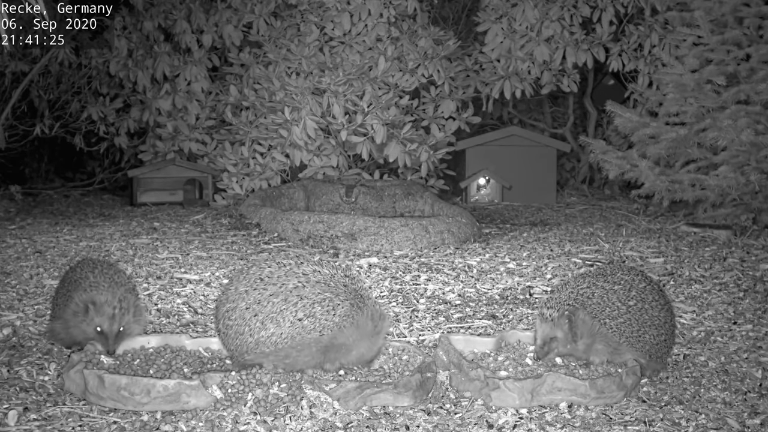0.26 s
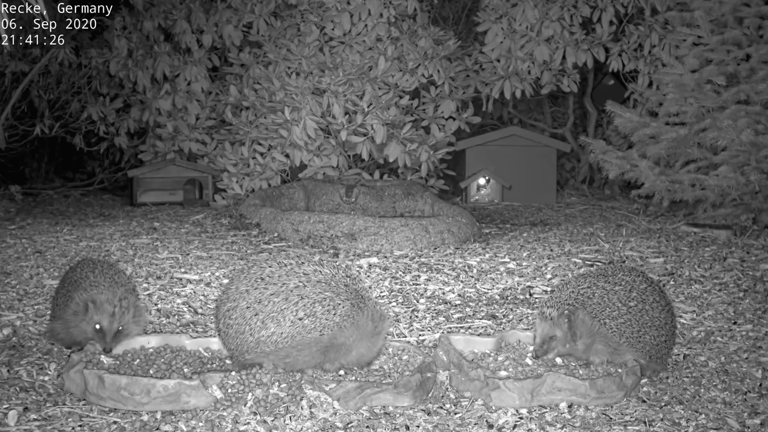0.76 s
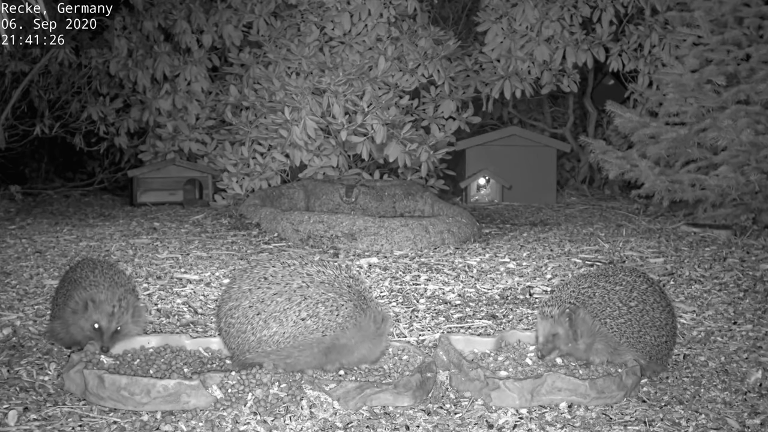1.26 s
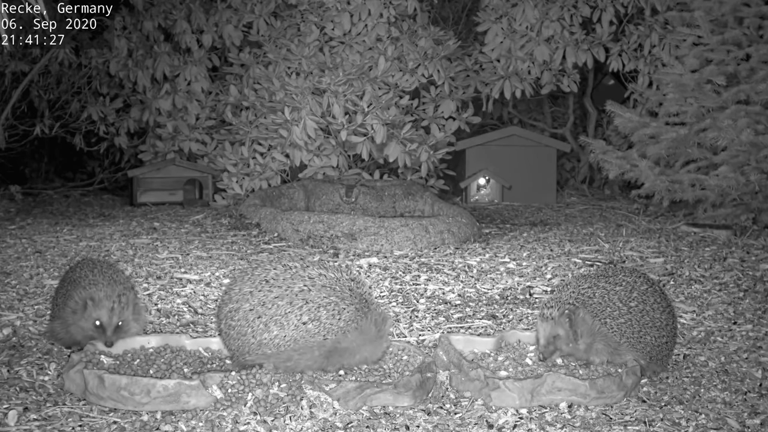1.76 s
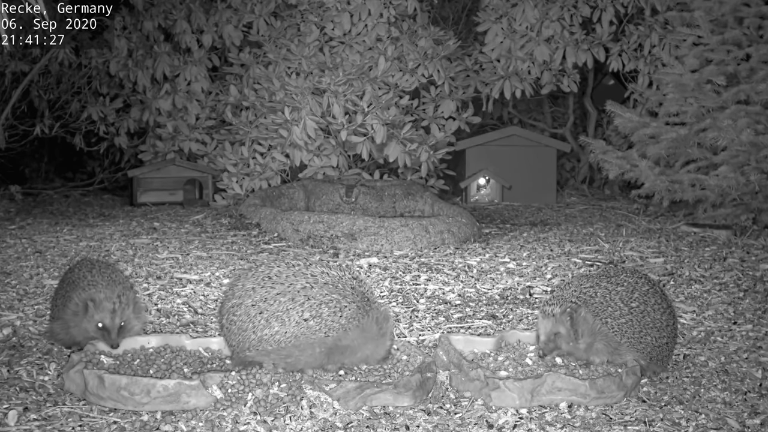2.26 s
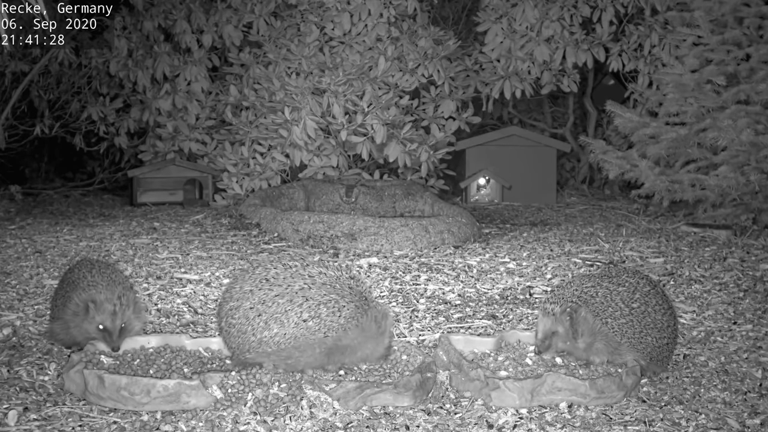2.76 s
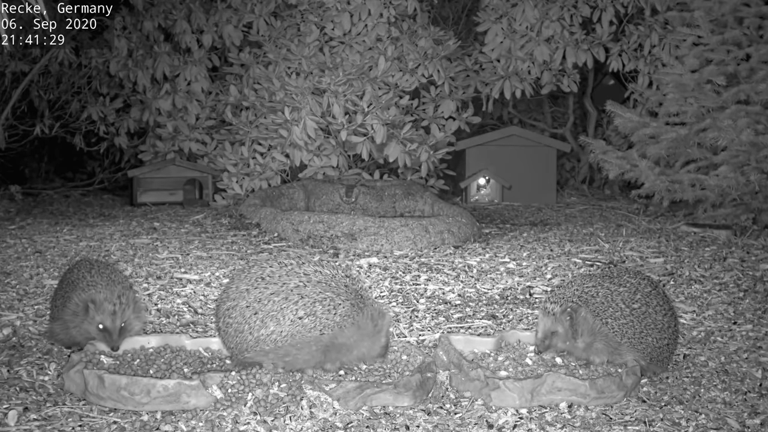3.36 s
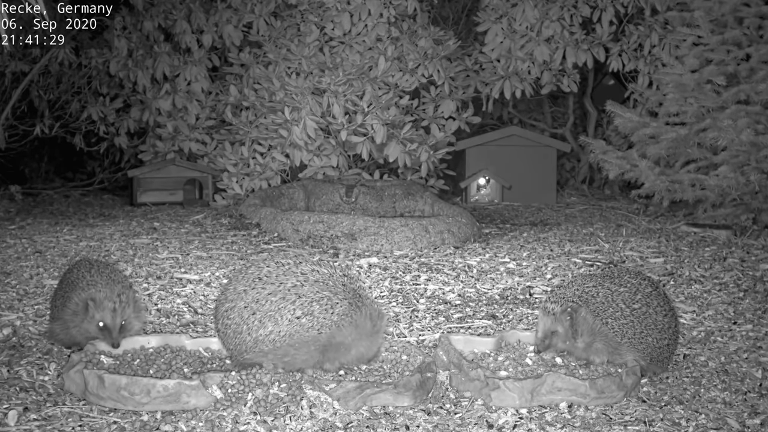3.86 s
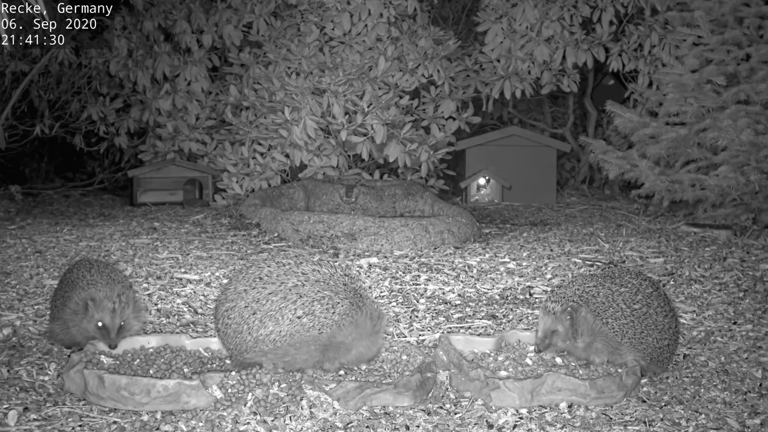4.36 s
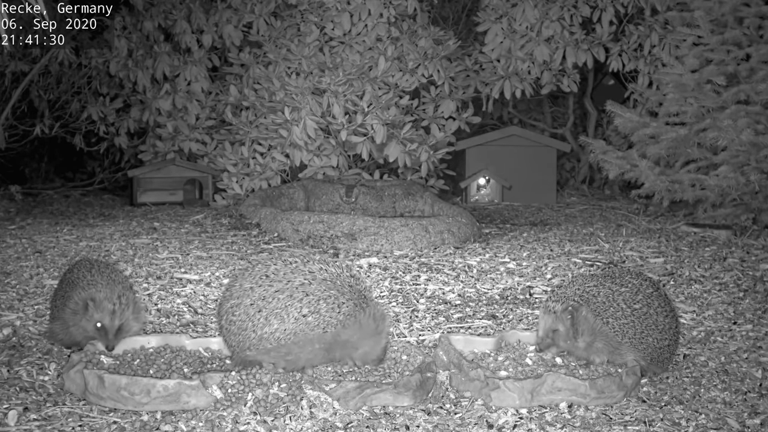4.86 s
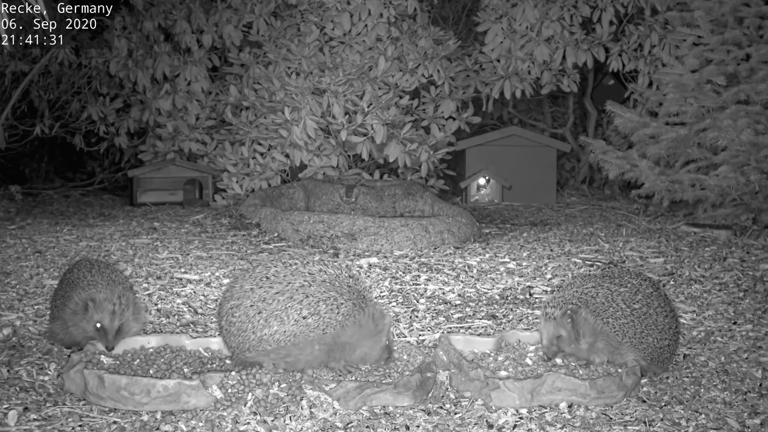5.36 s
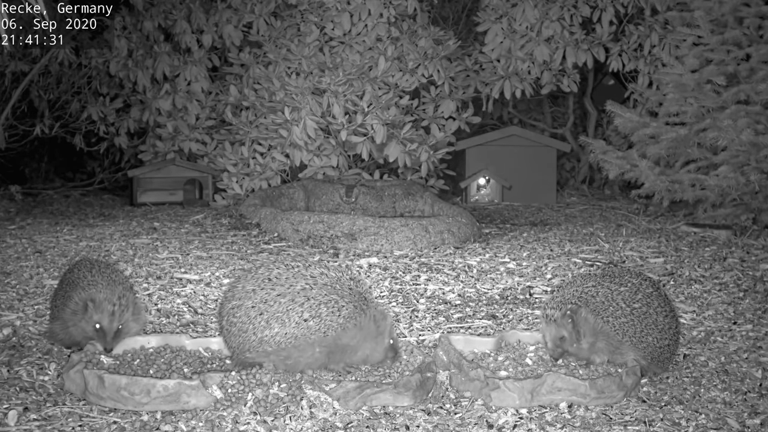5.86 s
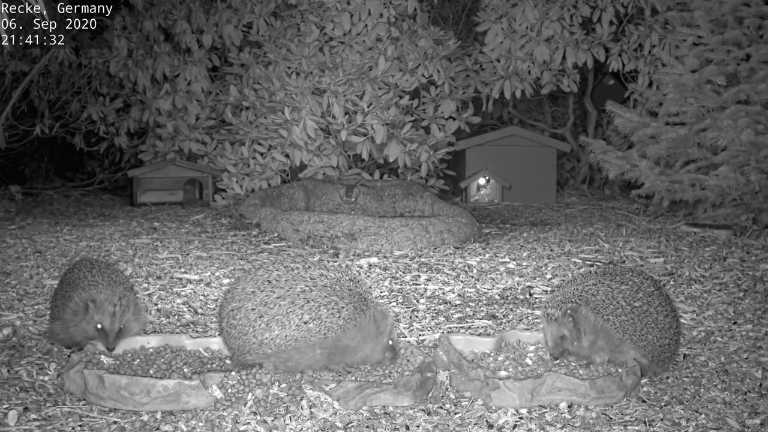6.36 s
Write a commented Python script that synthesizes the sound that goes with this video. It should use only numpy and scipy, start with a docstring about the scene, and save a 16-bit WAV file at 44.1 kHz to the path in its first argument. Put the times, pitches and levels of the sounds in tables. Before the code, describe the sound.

A quiet garden at night, with hedgehogs eating dry pellets close to a small housed microphone. Right at the start, two sharp, bright cracks almost together, then several lesser snaps until 0.4 seconds, with a soft puff near 0.3. From 0.5 to 1.1 only faint ticks. Between 1.2 and 2.1 the crunching is busiest: irregular brittle cracks, strongest around 1.35 and 1.55, with splinters and grit around each. A short grinding rush comes near 2.1, then brief fluttering sniffs at 2.2, 2.45 (the clearest) and 2.95. Duller moderate cracks fall around 2.7 and 3.0. From 3.3 to the end at about 6.6, chewing is sparse and weak, small clicks and crumbs, a duller knock near 5.2, faint sniffs near 5.1, 5.75 and 6.4, and a slightly firmer tick at 5.9. Steady low-weighted hiss continues throughout; the space is dry, with only tiny ground reflections.

```python
"""A garden at night: hedgehogs eat dry pellets close to a wildlife camera, under a steady low hiss.
Each pellet crack is an impulse with splinters, filtered by the ring of the pellet, a knock and a snap.
Smaller breaks follow as halves, grit and crumbs; short noise swells give sniffs and a rush of grinding.
Cracks and swells ring in the camera's housing and reflect in the garden; the hiss is shaped noise."""
import sys
import numpy as np
from scipy import signal
from scipy.fft import rfft, irfft
from scipy.io import wavfile
from scipy.ndimage import uniform_filter1d

SR = 44100
rng = np.random.default_rng(int(sys.argv[2]) if len(sys.argv) > 2 else 0)


def wrap_up_sound(samples):
    """Save the sound to the file named by the first command line argument, as 16-bit audio."""
    columns = np.atleast_2d(samples).T
    # keep every value between -1 and 1, then stretch to whole-number steps
    tamed = np.clip(columns, -1, 1)
    steps = np.round(tamed * 32767).astype(np.int16)
    wavfile.write(sys.argv[1], SR, steps)


N = 291045

# pellets cracking between the teeth: (time [s], ring frequency [Hz],
# ring level if its energy fell within 5 ms [dB], shatter: below 0 clean, above 0 rough [dB])
PELLET_BREAKS = [(0.0228, 5260, -24, -5.5), (0.03, 5470, -17.5, -4.5), (.175, 4440, -39.5, -10),
                 (0.2296, 4800, -41, 3), (0.2491, 5260, -25, -2), (.3108, 5400, -23.5, 6),
                 (.3684, 5000, -32.5, -10), (.542, 5070, -47.5, -4), (.84, 4440, -50.5, 4),
                 (.887, 4240, -38.5, 1), (.93, 6400, -47.5, 2), (1.106, 4500, -50.5, 6.5),
                 (1.166, 8100, -38, 1), (1.1786, 5460, -34, 3), (1.2083, 6540, -37.5, 2.5),
                 (1.29, 6540, -43, 1), (1.3423, 6500, -17, -8), (1.3769, 5970, -20.5, -0.5),
                 (1.455, 7300, -37, 1.5), (1.4816, 5600, -23, 2.5), (1.4915, 4140, -37, -7),
                 (1.542, 5180, -19.5, 1), (1.5515, 6400, -30, 3), (1.586, 5440, -27, 2),
                 (1.702, 5000, -36.5, 1), (1.822, 6200, -21.5, 0.5), (1.8384, 5000, -37.5, 5),
                 (2.002, 5030, -28.5, -2), (2.0225, 4900, -22, -0.5), (2.0432, 3730, -29, 2),
                 (2.08, 6300, -33.5, -1), (2.087, 4480, -35.5, 5.5), (2.1062, 6530, -32, 2.5),
                 (2.289, 4840, -38, 0.5), (2.319, 6300, -45, 2), (2.424, 4200, -33, 0.5),
                 (2.587, 4280, -41.5, 1.5), (2.6946, 4170, -29.5, -0.5), (2.7285, 2530, -29.5, 3.5),
                 (2.7955, 3750, -35, -5.5), (3.0356, 3900, -33.5, -4), (3.0396, 4220, -31.5, -2),
                 (3.304, 4270, -42.5, 2), (3.332, 4400, -40, 2.5), (3.3618, 5600, -44.5, 5),
                 (3.585, 3630, -47, 3), (3.6427, 4070, -37.5, 0.5), (3.6695, 4140, -39.5, -0.5),
                 (3.8426, 3960, -39.5, 2), (3.99, 3440, -46, -11), (4.384, 4120, -44.5, -2),
                 (4.514, 3520, -43.5, 2), (4.7998, 4270, -41, -3), (5.2317, 1080, -41.5, 1),
                 (5.355, 5600, -50, 8.5), (5.455, 3680, -54, -16), (5.645, 4730, -44, 3.5),
                 (5.828, 4170, -45, -4), (5.92, 4080, -36, -2), (6.153, 4420, -49, 4),
                 (6.1842, 3900, -44, 4), (6.4249, 5240, -39.5, 2)]

SIZE = 4096  # length of one impulse response [samples]
AGE = np.arange(SIZE) / SR  # time since the impulse [s]
BINS = np.fft.rfftfreq(SIZE, 1 / SR)  # [Hz]


def undb(db):
    """Level to amplitude: 20 dB is a factor of ten."""
    return 10 ** (np.asarray(db) / 20)


def unit(x):
    """Normalization to an rms value of 1."""
    return x / np.sqrt(np.mean(x ** 2))


def add(out, s, x):
    """Superposition: mix x into out from time s [s] on."""
    start = int(np.clip(s * SR, 0, N - 1))
    out[start:start + len(x)] += x[:N - start]


def resonance(f, hz, width):
    """Damped oscillator: complex response with gain 1 at its centre."""
    return 1j * f * width / (hz ** 2 - f ** 2 + 1j * f * width)


def band(hz, kind, order):
    """Butterworth filtering: complex response of a causal high- or band-pass."""
    b, a = signal.butter(order, hz, kind, fs=SR)
    return signal.freqz(b, a, BINS, fs=SR)[1]


def noise(points):
    """Spectral shaping: white noise coloured by (frequency [Hz], level [dB]) points, rms 1."""
    hz, db = np.transpose(points)
    f = np.maximum(np.fft.rfftfreq(N, 1 / SR), 1)
    colour = undb(np.interp(np.log(f), np.log(hz), db))
    return unit(irfft(rfft(rng.standard_normal(N)) * colour, N))


def prompt(gain):
    """Minimum phase: the causal response with this gain that gives out its energy earliest."""
    cepstrum = irfft(np.log(gain + 1e-3 * gain.max()))
    # fold the cepstrum onto positive times
    cepstrum[1:SIZE // 2] *= 2
    cepstrum[SIZE // 2 + 1:] = 0
    return np.exp(rfft(cepstrum))


def night(level_db=-40, waver_db=.3):
    """Stationary shaped noise: night air and microphone hiss, its level wavering very slightly."""
    # hiss spectrum: (frequency [Hz], relative density [dB per Hz])
    hiss_spectrum = [(11, -27), (18, 1.5), (43, 2), (74, -1.5), (212, -8.5), (290, -11.5), (385, -13.5),
                     (456, -17), (782, -19), (2300, -32.5), (3420, -33.5), (4170, -35.5), (7140, -37),
                     (15800, -39.5)]
    waver = np.interp(np.arange(N), np.linspace(0, N, 30), rng.standard_normal(30))
    return noise(hiss_spectrum) * undb(level_db + waver_db * waver)


def garden(x, bounce_s=.0025, bounce=0.19):
    """Reflection and scattering: a ground bounce, scatter from bowls and stones, a trace from shrubs."""
    scatter_db, scatter_t60_s = -16, .04
    shrubs_db, shrubs_t60_s = -30, .053
    echo = np.zeros(SIZE)
    for db, t60_s in (scatter_db, scatter_t60_s), (shrubs_db, shrubs_t60_s):
        decay = np.exp(-np.log(1000) * AGE / t60_s)
        tail = rng.standard_normal(SIZE) * decay * (AGE > bounce_s)
        echo += undb(db) * tail / np.linalg.norm(tail)
    echo[int(bounce_s * SR)] += bounce
    return x + signal.fftconvolve(x, echo)[:N]


def housing(f, leak=0.051):
    """Modal superposition: air resonances of the camera housing, successive modes opposite in sign."""
    # air modes: (frequency [Hz], width [Hz], level [dB])
    air_modes = [(860, 206, -2), (1037, 144, 3), (1370, 160, -3.5), (2036, 170, 8.5), (2090, 339, 5),
                 (3070, 160, 0.5), (3454, 190, 2.5), (4410, 390, 0), (4720, 85, 0.5), (5454, 710, -4.5),
                 (5803, 84, 4), (6460, 650, -1.5), (7335, 660, 1), (8110, 600, 2), (8740, 610, 1.5),
                 (9260, 700, -1.5), (11370, 920, -4.5), (11300, 530, -7), (13600, 810, -10),
                 (15300, 280, -9.5)]
    response = leak
    for k, (hz, width, db) in enumerate(air_modes):
        response = response + (-1) ** k * undb(db) * resonance(f, hz, width)
    return response


def noise_swells(flutter_s=0.0052, flutter_db=2.7):
    """Modulated coloured noise: fluttering swells, heard as sniffs and once as a rush of grinding."""
    # swells of noise: sniffs, and at 2.085 s a rush of grinding:
    # (time of peak [s], Gaussian rise [s], Gaussian fall [s], level before flutter [dB])
    swells = [(.338, 0.0042, 0.024, -46), (1.19, 0.03, 0.047, -59), (1.615, 0.026, 0.013, -49.5),
              (2.085, 0.028, 0.013, -45), (2.203, 0.02, 0.011, -43), (2.443, 0.021, 0.011, -35),
              (2.954, 0.021, 0.012, -40), (3.2, 0.047, 0.015, -50.5), (5.081, 0.021, 0.017, -47.5),
              (5.752, 0.016, 0.012, -54), (6.379, 0.011, 0.0099, -54)]
    # colour of the noise ahead of the housing: (frequency [Hz], level [dB])
    swell_colour = [(300, -28), (1000, 4.5), (2100, -1.5), (3400, 3), (4300, 6.5), (5300, 0.5), (6600, 1.5),
                    (8500, 5.5), (10600, 4), (12900, 5), (16000, -6)]
    t = np.arange(N) / SR
    cavity = housing(np.fft.rfftfreq(N, 1 / SR))
    rush = unit(irfft(rfft(noise(swell_colour)) * cavity, N))
    envelope = np.zeros(N)
    for s, rise, fall, db in swells:
        spread = np.where(t < s, rise, fall)
        envelope += undb(db) * np.exp(-.5 * ((t - s) / spread) ** 2)
    flutter = unit(uniform_filter1d(rng.standard_normal(N), size=int(flutter_s * SR)))
    return rush * envelope * undb(flutter_db * flutter)


def crumbs(count=240, fade_db=12, crumb_hz=4300, spread_octaves=0.64, shatter_db=1):
    """Random point process: faint ticks of chewing, as rows like those of the pellets."""
    # grinding of the jaws: (time [s], ring level of the loudest crumbs [dB])
    munching = [(0, -56), (.65, -58), (1.2, -51), (1.7, -47), (2.7, -48), (3.8, -52), (4.15, -55),
                (4.7, -54.5), (5.9, -51), (6.6, -55)]
    when, size, pitch = rng.uniform(0, 1, (count, 3)).T
    times = when * N / SR
    hz = crumb_hz * 2 ** (spread_octaves * (2 * pitch - 1))
    db = np.interp(times, *np.transpose(munching)) - fade_db * size
    return zip(times, hz, db, np.full(count, shatter_db))


def grit(count=6, before_s=.016, after_s=.026, loudest_db=-39, with_force=0.35, fade_db=8,
         grit_hz=4600, spread_octaves=.45, shatter_db=1):
    """Clustered fracture: a jaw stroke also crushes bits around each crack, louder in a hard bite."""
    rows = []
    for s, _, ring_db, _ in PELLET_BREAKS:
        for when, size, pitch in rng.uniform(0, 1, (count, 3)):
            time = s - before_s + (before_s + after_s) * when
            hz = grit_hz * 2 ** (spread_octaves * (2 * pitch - 1))
            # with_force: dB of grit per dB of pellet
            db = loudest_db + with_force * ring_db - fade_db * size
            rows.append((time, hz, db, shatter_db))
    return rows


def halves(count=2, soonest_s=.002, within_s=0.0083, weaker_db=-14, fade_db=7,
           spread_octaves=0.39, shatter_db=1.5):
    """Secondary fracture: the halves give way milliseconds after the pellet, the later the weaker."""
    rows = []
    for s, pellet_hz, ring_db, _ in PELLET_BREAKS:
        for late, pitch in rng.uniform(0, 1, (count, 2)):
            time = s + soonest_s + within_s * late
            hz = pellet_hz * 2 ** (spread_octaves * (2 * pitch - 1))
            rows.append((time, hz, ring_db + weaker_db - fade_db * late, shatter_db))
    return rows


def fracture(shards=0.2, shards_s=0.0024):
    """Impulsive excitation: one sharp break, then a fast-fading run of tiny splinters."""
    push = shards * rng.standard_normal(SIZE) * np.exp(-AGE / shards_s)
    push[0] += 1
    return rfft(push)


def cracks(rows, ring_width_hz=1700, off_ring=0.071, roll_off=1.21, low_hz=740, knock_hz=3100,
           snap_hz=9000):
    """Impulse response of a break: pellet ring, jaw knock and snap at once; a clean break rings purer."""
    # knock and snap levels relative to the ring, for a 5 kHz pellet and shatter 0
    knock_base_db, knock_db_per_octave, knock_per_shatter = -8, 0.5, 1
    snap_base_db, snap_per_shatter = -13.5, 1.95
    out, cavity = np.zeros(N), housing(BINS)
    jaw = unit(abs(cavity * band([low_hz, knock_hz], "bandpass", order=3)))
    above_jaw = cavity * band(knock_hz, "highpass", order=2)
    top = unit(abs(cavity * band(snap_hz, "highpass", order=4)))
    for s, hz, ring_db, shatter_db in rows:
        ring = off_ring + resonance(BINS, hz, ring_width_hz * undb(shatter_db))
        # third-order roll-off: a low ring has little treble above it
        treble_loss = np.sqrt(1 + (BINS / (roll_off * hz)) ** 6)
        pellet = unit(abs(above_jaw * ring) / treble_loss)
        # a high ring knocks slightly more; a rough break knocks and snaps more
        knock_db = knock_base_db + knock_db_per_octave * np.log2(hz / 5000) + knock_per_shatter * shatter_db
        snap_db = snap_base_db + snap_per_shatter * shatter_db
        gain = np.sqrt(pellet ** 2 + (undb(knock_db) * jaw) ** 2 + (undb(snap_db) * top) ** 2)
        crack = unit(irfft(fracture() * prompt(gain)))
        # ring levels refer to 5 ms; knock and snap add their energy
        strength = np.sqrt(np.mean(gain ** 2) * .005 * SR / SIZE)
        add(out, s, undb(ring_db) * crack * strength)
    return out


def scene():
    """Linear superposition: the feeding animals with their reflections, over the night hiss."""
    breaking = cracks(PELLET_BREAKS) + cracks(halves()) + cracks(grit()) + cracks(crumbs())
    feeding = breaking + noise_swells()
    return (garden(feeding) + night())[None]


def record(dry, top_hz=15900):
    """Band limiting: the camera cuts off the top with a steep elliptic low-pass."""
    return signal.sosfilt(signal.ellip(10, .1, 70, top_hz, fs=SR, output="sos"), dry)


dry = scene()
out = record(dry)
wrap_up_sound(out)
```